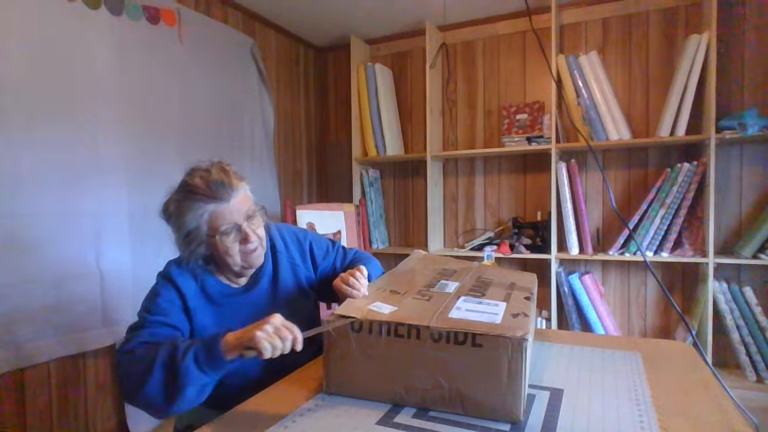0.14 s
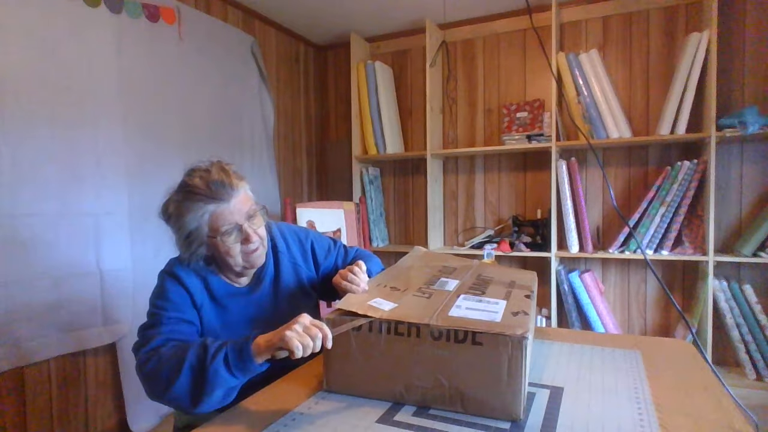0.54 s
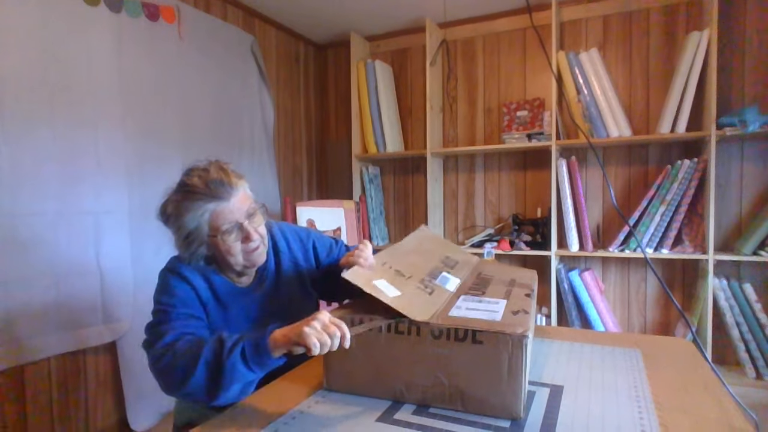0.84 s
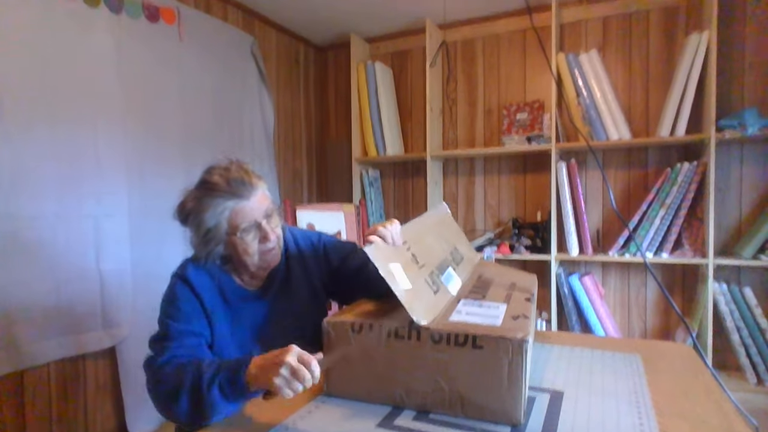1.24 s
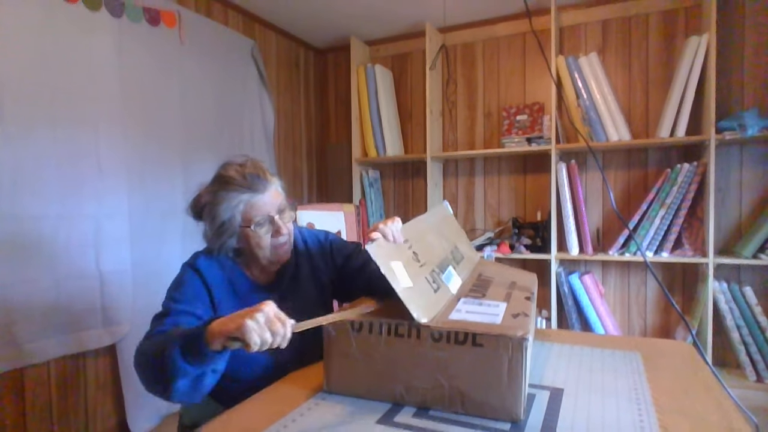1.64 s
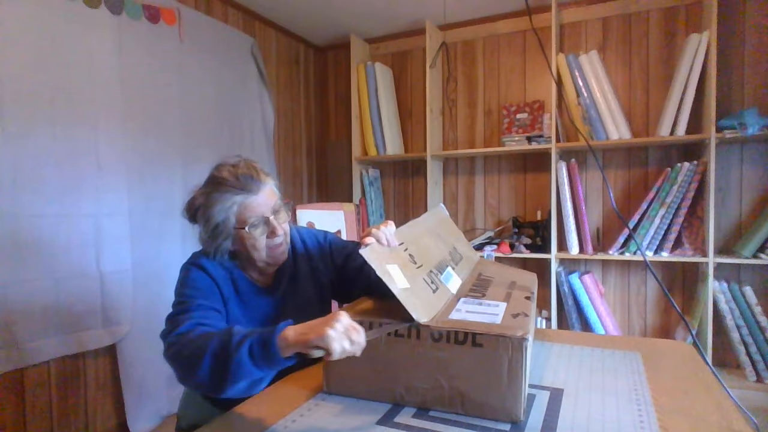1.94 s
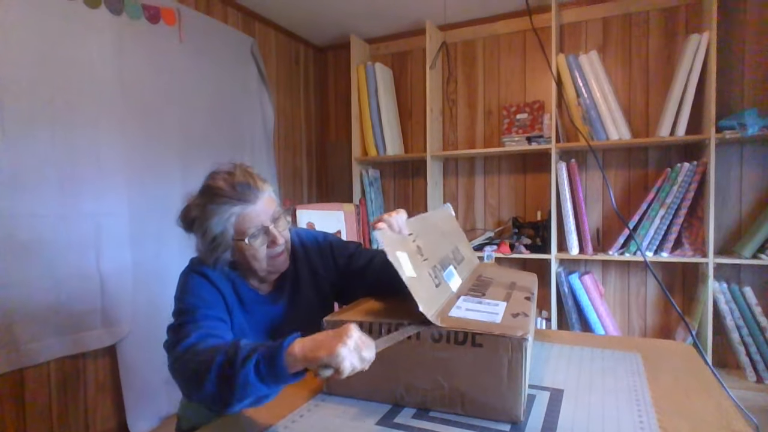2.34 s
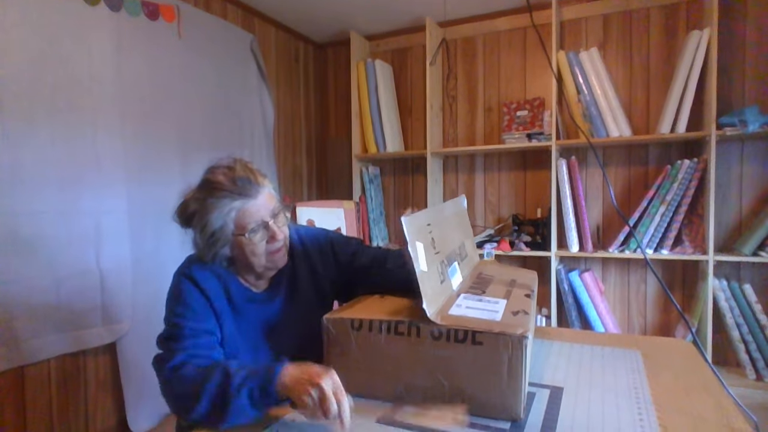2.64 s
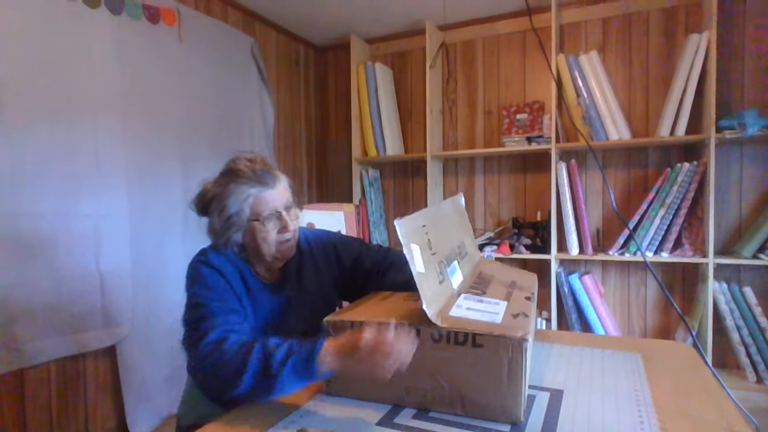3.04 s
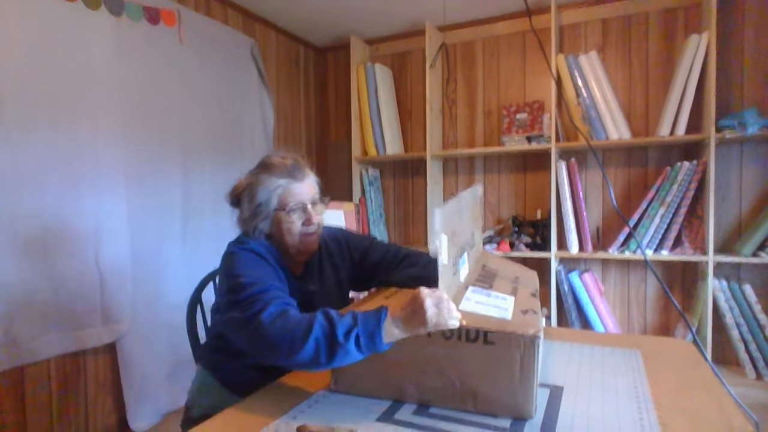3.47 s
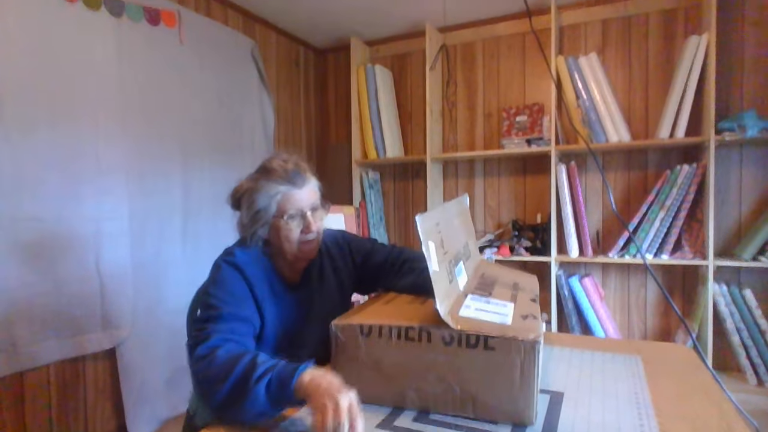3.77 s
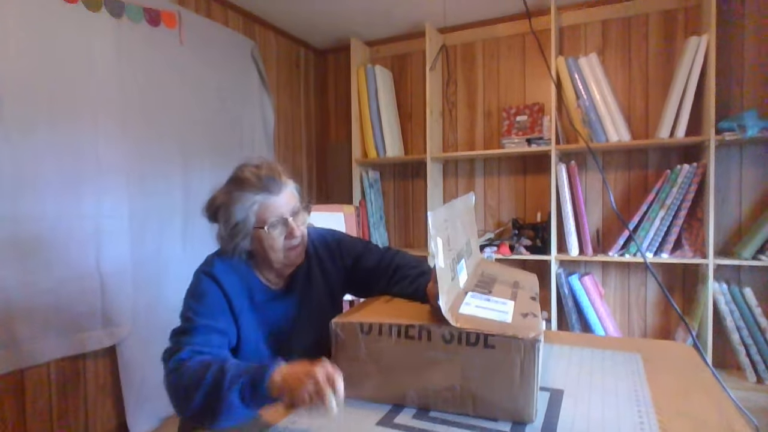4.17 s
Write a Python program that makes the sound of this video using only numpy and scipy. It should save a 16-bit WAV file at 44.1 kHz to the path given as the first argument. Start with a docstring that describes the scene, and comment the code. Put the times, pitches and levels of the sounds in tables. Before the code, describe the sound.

A small, fairly dry wooden room with faint low rumble, heard close in stereo. From 0 to 0.5 s a blade and flap scrape softly on cardboard, with light hollow knocks and a sharp tape snap near 0.4. At 0.7-1.1 s come stronger gritty rasps, drumming panels and a dense run of crackling snaps, as knitted sleeves begin brushing. Around 1.25-1.6 s it quietens to a small snap, dull boxy thumps and faint cloth. At 1.9 s there is a short scrape and blade tap; at 2.15-2.2 s a tight cluster of snaps with a hard box knock, the loudest tearing moment. Sleeves swish from 2.4 s, with soft thumps at 2.8. At 2.9-3.15 s the dropped knife bounces quickly, handle thudding, blade clicking and ringing thinly. Cloth sweeps continue at 3.25-4.3 s, with a faint scrape at 3.4, a soft boomy knock at 3.87 and tiny last snaps after 4.17.

```python
"""A small wood-panelled room, in stereo: a long knife works under the taped flap of a cardboard box on a table.
At first blade and flap scrape, tape snaps and the box knocks, as sweater sleeves begin to brush past.
A dense run of snaps and a hard knock follow; the dropped knife then bounces, its handle thudding and blade ringing.
Sleeves sweep on over cardboard and tabletop, with a short scrape, softer knocks and a few last snaps.
Friction is built from random slips, snaps from noise bursts, blows from decaying modes, over a low rumble."""
import sys
import numpy as np
from scipy import signal
from scipy.fft import rfft, irfft
from scipy.io import wavfile
from scipy.ndimage import uniform_filter1d

SR = 44100
rng = np.random.default_rng(int(sys.argv[2]) if len(sys.argv) > 2 else 0)


def generate_wav(signal):
    """Clip the signal to [-1, 1] and save it as 16-bit WAV at the path in sys.argv[1]."""
    frames = np.transpose(np.atleast_2d(signal))
    scaled = np.clip(frames, -1, 1) * 32767
    pcm = np.round(scaled).astype(np.int16)
    wavfile.write(sys.argv[1], SR, pcm)


N = 189833

# Room rumble. Each row: frequency in Hz, relative density in dB per Hz.
AMBIENCE_SPECTRUM = [(15,2), (33,2.5), (48,11), (70,-10.5), (140,-6), (350,-13), (700,-17), (2000,-24),
                     (5000,-53), (16000,-66)]
# Stereo width of diffuse sound. Each row: frequency in Hz, side against mid in dB, before a source's own side level.
STEREO_WIDTH = [(30,-12), (130,-20), (280,-19), (550,-10), (1100,-6), (3000,-5), (8000,-2.2), (14000,-.8)]
# Decay of the room. Each row: frequency in Hz, time to fall 60 dB in seconds.
ROOM_DECAY = [(120, 0.94), (500, 0.44), (2000, 0.27), (6000, 0.17), (15000, 0.16)]
EDGE_HZ = 16050  # upper limit of the recorder

# Sleeves sweeping past. Each row: start in seconds, speeding up in seconds, slowing down in seconds,
# hiss of the fibres in dB, rub on the surface beneath in dB (both before the trims in sleeves()).
SLEEVE_SWEEPS = [(.66, 0.11, .3, -41, -47), (1.02, 0.19, 0.28, -44, -50.5),
                 (1.285, 0.026, 0.045, -45.5, -58), (1.44, 0.027, 0.11, -55, -57),
                 (1.55, 0.045, 0.025, -44.5, -51.5), (2.355, 0.013, 0.047, -44, -46.5),
                 (2.39, 0.079, .08, -38.5, -44), (2.52, 0.095, 0.057, -36.5, -51.5),
                 (2.58, .18, 0.28, -29, -47), (3.02, 0.12, 0.19, -47.5, -50.5),
                 (3.24, .03, 0.088, -37, -49.5), (3.27, .17, 0.13, -31, -41.5),
                 (3.56, 0.032, 0.062, -37.5, -45.5), (3.655, 0.22, .17, -30, -38.5),
                 (3.96, .02, 0.026, -33.5, -36.5), (4.02, 0.072, 0.24, -44, -56),
                 (4.21, 0.035, .16, -41.5, -59)]
# Powers shaping the loudness of a sweep: while speeding up, while slowing down (no unit).
SWEEP_POWERS = (0.95, 1.34)
STIR_HISS_DB, STIR_RUB_DB = -60, -65  # the cloth never lies quite still; before the same trims
# Fine hiss of knitted fibres. Each row: frequency in Hz, relative density in dB per Hz.
FIBRE_HISS_SPECTRUM = [(800, -11), (2500, -7.5), (4200, -1), (7300, 1), (9000, -2.5), (15500, -0.5)]
# Rub of cloth on the surface beneath. Each row: frequency in Hz, relative density in dB per Hz.
CLOTH_RUB_SPECTRUM = [(60, -6.5), (130, -2), (260, -2.5), (430, 3.5), (700, -2.5), (1500, 1), (2800, -0.5),
                      (5000, -11), (12000, -75)]

# Blows on the box. Each row: start in seconds, level in dB, brightness (low-pass cutoff) in Hz,
# boom of the struck panel in Hz, boom relative to the level in dB.
BOX_KNOCKS = [(0.042,-52,1220,135,-6), (0.281,-40.5,925,145,-5.5), (.388,-31.5,930,125.5,-13),
              (.706,-34,655,138,-7), (1.368,-37.5,920,160,3.5), (1.383,-45,408,202,8.5),
              (1.591,-43,1160,118,-7), (1.87,-40,480,150,-1.5), (2.178,-25,2200,146,-9.5),
              (2.770,-31.5,796,152,-7), (2.797,-33,426,138,-4), (3.243,-44,500,140,-13),
              (3.865,-32,750,123.6,0), (3.889,-49,550,131,-14)]
# Blade tapping the box. Each row: start in seconds, level in dB, brightness (low-pass cutoff) in Hz.
BLADE_TAPS = [(1.9485, -30.5, 4000)]
# Main modes of the box, led by a low resonance of the table and floor beneath it. Each row: frequency in Hz,
# relative level in dB, time to fall 60 dB in seconds.
BOX_MODES = [(53,4,0.075), (121,-6.5,0.47), (209.6,-7,0.32), (328.3,2,0.17), (420,1,0.17), (492.3,7.5,0.12),
             (640,3,0.07), (900,-49,0.25), (990,-4,0.28)]
# Main modes of the knife. Each row: frequency in Hz, relative level in dB, time to fall 60 dB in seconds.
KNIFE_MODES = [(221, -8.5, 0.37), (425, -13.5, 0.3), (474, -20.5, 0.59), (710, -12.5, 0.11),
               (1088, -11.5, 0.36), (1150, -14.5, 0.28), (1340, -12, 0.13), (1760, -19, 0.26),
               (1925, -9, 0.11), (2510, -7.5, 0.13), (3300, -16.5, 0.2), (4170, -34, .22)]
# Lesser resonances of the box panels. Each row: frequency in Hz, relative density in dB per Hz.
PANEL_SPECTRUM = [(50, 5.5), (140, -0.5), (480, 0.5), (800, -1), (2000, -5), (4500, 1.5), (15000, 1)]

# Knife bouncing on the table. Each row: start in seconds, thud of the handle in dB, click of the blade in dB,
# centre of the click in Hz.
KNIFE_BOUNCES = [(2.9095, -23, -14.5, 4700), (2.916, -36.5, -23, 8200), (2.9385, -19, -17.5, 1800),
                 (2.9512, -26, -24.5, 3500), (2.966, -26, -44, 2000), (2.9895, -26, -20.5, 7350),
                 (3.011, -30.5, -45, 11000), (3.0686, -38, -35.5, 7500), (3.088, -38.5, -33, 7360),
                 (3.1331, -48, -36.5, 7500)]
# The blade ringing while clear of the table. Each row: start in seconds, level in dB.
BLADE_RINGS = [(3.0, -35.5), (3.088, -41)]
# Modes of the ringing blade. Each row: frequency in Hz, relative level in dB, time to fall 60 dB in seconds.
BLADE_MODES = [(3600,-11,.15), (5450,-11,.2), (8156,-11,.1), (10990,-8,.1), (12200,0,.19)]
# Main modes of the table. Each row: frequency in Hz, relative level in dB, time to fall 60 dB in seconds.
TABLE_MODES = [(136.6,-10.5,0.55), (220.8,-10,0.55), (327.8,0,0.28), (422,-9,0.55), (483.4,-8,0.53),
               (646,-1,0.27), (716,-17,0.28), (759,2,0.22), (835,-3.5,0.34), (969,-2.5,0.48), (1106,0,0.38),
               (1284,-1,0.14), (1300,8.5,0.1), (1425,-1,0.22), (1523,-6,0.12), (1617,10,0.1), (1710,1,0.19)]
# Lesser resonances of the tabletop. Each row: frequency in Hz, relative density in dB per Hz.
TABLETOP_SPECTRUM = [(50,-7), (140,3), (260,-1.5), (700,0), (1600,0.5), (2600,-1.5), (3800,3), (15000,-22)]
# a thud at THUD_DB has its cutoff at THUD_HZ; harder ones are brighter
THUD_HZ, THUD_DB, THUD_OCTAVES_PER_DB = 1240, -22, 0.053

# Blade, flap and hand scraping on cardboard. Each row: start in seconds, speeding up in seconds, slowing down
# in seconds, grit of tape and fibres in dB, rasp of the cut edge in dB, drumming of the panels in dB
# (all three before the trims in scrapes()).
BOX_SCRAPES = [(.005, 0.064, .14, -40.5, -47, -40.5), (.05, 0.2, .16, -39.5, -47.5, -40.5),
               (.275, .02, 0.15, -58, -47.5, -34), (.352, 0.04, 0.17, -39.5, -39.5, -30),
               (.655, 0.018, .09, -58, -55, -42), (.695, 0.058, 0.051, -27.5, -31.5, -24.5),
               (.772, 0.024, .065, -35.5, -39.5, -30.5), (.91, 0.07, 0.065, -31, -34.5, -63),
               (.98, 0.076, 0.069, -29, -25.5, -50), (1.07, 0.024, 0.044, -53, -51, -32),
               (1.866, .008, 0.053, -37.5, -44.5, -51), (1.9, 0.078, .18, -44.5, -42, -43),
               (3.39, 0.095, 0.1, -43, -48, -35.5)]
# Powers shaping the loudness of a scrape: while speeding up, while slowing down (no unit).
SCRAPE_POWERS = (1.05, 1.84)
# Grit of tape and fibres. Each row: frequency in Hz, relative density in dB per Hz.
GRIT_SPECTRUM = [(1500, 2), (3500, -9.5), (5200, 7.5), (7500, 1.5), (9500, 5), (15500, 4)]
# Rasp of the cut edge. Each row: frequency in Hz, relative density in dB per Hz.
RASP_SPECTRUM = [(300,-23), (750,-3.5), (1200,-1.5), (1800,1.5), (2500,3), (3300,-2), (4200,-8), (8000,-17)]
# Drumming of the panels. Each row: frequency in Hz, relative density in dB per Hz.
DRUM_SPECTRUM = [(50, 10), (95, -12), (140, 7), (200, -0.5), (340, 2), (440, 7.5), (600, -0.5), (900, 1.5),
                 (2000, -14.5)]

# Single snaps of tape and fibre. Each row: start in seconds, level in dB before the trim in tape(), centre in Hz.
TAPE_SNAPS = [(0.2845, -29.5, 7040), (0.3906, -18.5, 5700), (.6264, -39.5, 2920), (0.6657, -35, 8000),
              (.7006, -32, 7040), (0.737, -19.5, 5500), (0.8233, -18, 8000), (0.8506, -17, 5350),
              (0.8995, -16, 2800), (.9195, -19.5, 9500), (1.048, -15.5, 3200), (1.24, -30, 3300),
              (2.1445, -20.5, 2488), (2.1575, -24.5, 10900), (2.1649, -17.5, 8650), (2.1788, -8.5, 2730),
              (2.1863, -15.5, 4640), (2.3558, -39, 4000), (4.1753, -33, 5750), (4.233, -28, 7100)]
# Strained tape crackling at random. Each row: start in seconds, length in seconds, middle level in dB
# before the trim in tape().
TAPE_CRACKLES = [(0.701, .3, -29), (4.239, .04, -32.5)]
CRACKLES_PER_S, CRACKLE_HZ, CRACKLE_SPREAD_DB = 40, 6800, 7  # the spread reaches both ways


def gain_of(db):
    """Decibels to amplitude."""
    return 10 ** (np.asarray(db) / 20)


def evened(x):
    """Scales to rms 1."""
    return x / np.sqrt(np.mean(x ** 2) + 1e-20)


def read(points, hz):
    """Reads a spectrum on a log-frequency axis."""
    f, value = np.transpose(points)
    return np.interp(np.log(hz + 1), np.log(f + 1), value)


def add(mix, s, sound):
    """Mixes a sound in at time s, cut off at the end of the mix."""
    part = mix[..., round(s * SR):][..., :sound.shape[-1]]
    part += sound[..., :part.shape[-1]]


def coloured(x, spectrum, size=4096):
    """Causal minimum-phase filter with the given spectrum."""
    hz = abs(np.fft.fftfreq(size, 1 / SR))
    log_gain = np.log(gain_of(read(spectrum, hz)))
    response = np.exp(np.conj(signal.hilbert(log_gain)))
    taps = np.fft.ifft(response).real[:size // 2]
    return signal.oaconvolve(x, taps)[:len(x)]


def spread(mid, side):
    """Two unrelated signals become a left-right pair that is narrower in the bass than in the treble."""
    side = coloured(side, STEREO_WIDTH)
    return np.array([mid + side, mid - side])


def room(x, wet_db, echo_db, echo_s=.0066):
    """One early reflection, its path about 2 m longer, and a short tail whose treble dies first."""
    taps = rng.standard_normal((2, SR // 2)) * (np.arange(SR // 2) > SR * .002)
    hz, t, z = signal.stft(taps, SR, nperseg=256)
    decay = gain_of(-60 * t / read(ROOM_DECAY, hz)[:, None])
    tails = signal.istft(z * decay, SR, nperseg=256)[1]
    response = gain_of(wet_db) * spread(*tails) / np.linalg.norm(tails[0])
    response[:, round(echo_s * SR)] += gain_of(echo_db)
    mono = x.mean(0)[None]
    return x + signal.fftconvolve(mono, response, axes=1)[:, :N]


def strokes(rows, powers):
    """One gain over time for each dB column: every stroke speeds up from rest and slows to rest again."""
    t, power = np.arange(N) / SR, 0
    for start, rise_s, fall_s, *db in rows:
        end = start + rise_s + fall_s
        up, down = np.clip([(t - start) / rise_s, (end - t) / fall_s], 0, 1)
        loudness = np.sin(np.pi / 2 * up) ** powers[0] * np.sin(np.pi / 2 * down) ** powers[1]
        power = power + np.outer(gain_of(db), loudness) ** 2
    return np.sqrt(power)


def drifting(x, patchy_db, size=512):
    """Broad patches of colour come and go as the contact moves."""
    z = signal.stft(x, nperseg=size)[2]
    blur = np.outer(np.hanning(15), np.hanning(50))  # across frequency, across time
    patches = signal.fftconvolve(rng.standard_normal(z.shape), blur, "same")
    return signal.istft(z * gain_of(patchy_db * evened(patches)), nperseg=size)[1][:N]


def friction(spectrum, grains_per_s, size_db, smooth, flutter_db):
    """Tiny slips of uneven size, coming in clumps, over a blur of smaller ones."""
    wander = uniform_filter1d(uniform_filter1d(rng.standard_normal(N), size=260), size=130)
    clumps = gain_of(flutter_db * evened(wander))
    sizes = gain_of(size_db * np.minimum(rng.exponential(1, N), 3.3))
    sizes = sizes * (rng.random(N) < grains_per_s / SR)
    channels = []
    for channel in range(2):
        grains = evened(sizes * rng.choice([-1, 1], N))
        slips = grains + smooth * rng.standard_normal(N)
        slips = drifting(slips * clumps, patchy_db=1.6)
        channels.append(evened(coloured(slips, spectrum)))
    return spread(*channels)


def ringing(modes, t):
    """Decaying modes; neighbours start in opposite directions."""
    hz, db, t60 = np.transpose(modes)[:, :, None]
    signs = (-1) ** np.arange(len(modes))[:, None]
    return (signs * gain_of(db - 60 * t / t60) * np.sin(2 * np.pi * hz * t)).sum(0)


def blows(rows, modes, spectrum, dense_db, t60, smack_db, smack_s=0.0027, side_db=-2.5, size=900):
    """Each blow smacks, then rings the main modes and a diffuse crowd of lesser ones; soft contact dulls both."""
    out, t = np.zeros((2, N)), np.arange(SR // 2) / SR
    tones = ringing(modes, t)
    envelope = (1 + gain_of(smack_db) * np.exp(-t / smack_s)) * gain_of(-60 * t / t60)
    for s, db, bright_hz, *_ in rows:
        noises = rng.standard_normal((2, len(t)))
        dense, side = (coloured(noise * envelope, spectrum) for noise in noises)
        # levels refer to the opening 900 samples, about 20 ms
        mid = tones / tones[:size].std() + gain_of(dense_db) * dense / dense[:size].std()
        dulling = signal.butter(2, min(bright_hz, SR / 3), fs=SR)
        pair = signal.lfilter(*dulling, [mid, side])
        mid, side = pair / pair[:, :size].std(1, keepdims=True)
        add(out, s, gain_of(db) * spread(mid, gain_of(side_db) * side))
    return out


def crack(decay_s, centre_hz, below_db=-11, above_db=-6, size=64):
    """A burst about a millisecond long that swells as the break runs, with one broad resonance."""
    t = np.arange(SR // 20) / SR
    burst = rfft(rng.choice([-1, 1], len(t)) * np.sqrt(t) * np.exp(-t / decay_s))
    # a sudden break excites all pitches about equally
    flattened = burst / (abs(burst) + 1e-9) ** .7
    burst = irfft(flattened, len(t)) * np.exp(-t / (8 * decay_s))
    # so small a source radiates little below its resonance
    shape = [(centre_hz / 8, -30), (centre_hz / 2, below_db), (centre_hz, 0),
             (centre_hz * 2, above_db), (centre_hz * 4, above_db - 3)]
    burst = coloured(burst, shape)
    return burst / burst[:size].std()


def wide_crack(decay_s, centre_hz, side_db):
    """A left-right pair made from two independent cracks."""
    return spread(crack(decay_s, centre_hz), gain_of(side_db) * crack(decay_s, centre_hz))


def ambience(floor_db=-52, sway_db=-38, sway_hz=6, sway_width_hz=0.24):
    """Quiet room rumble and a slow sway of air pressure below hearing."""
    floor = spread(*[evened(coloured(rng.standard_normal(N), AMBIENCE_SPECTRUM)) for channel in range(2)])
    hz = np.fft.rfftfreq(N, 1 / SR)
    phases = np.exp(2j * np.pi * rng.random(len(hz)))
    sway = irfft(phases / (1 + ((hz - sway_hz) / sway_width_hz) ** 2), N)
    return gain_of(floor_db) * floor + gain_of(sway_db) * evened(sway)


def sleeves():
    """Knitted cloth hisses finely and rubs the surface under it."""
    hiss, rub = strokes(SLEEVE_SWEEPS, SWEEP_POWERS)
    hiss = np.hypot(hiss, gain_of(STIR_HISS_DB))
    rub = np.hypot(rub, gain_of(STIR_RUB_DB))
    hiss = hiss * friction(FIBRE_HISS_SPECTRUM, grains_per_s=5000, size_db=0, smooth=1.84, flutter_db=1.43)
    rub = rub * friction(CLOTH_RUB_SPECTRUM, grains_per_s=2000, size_db=3.0, smooth=1.67, flutter_db=1.46)
    return room(gain_of(-1.14) * hiss + gain_of(-2.5) * rub, wet_db=-6.5, echo_db=-29.5)


def box(boom_t60=0.3):
    """The hollow box thumps when shoved, and the blade twangs against it."""
    out = blows(BOX_KNOCKS, BOX_MODES, PANEL_SPECTRUM, dense_db=11.5, t60=0.29, smack_db=-2)
    out += blows(BLADE_TAPS, KNIFE_MODES, PANEL_SPECTRUM, dense_db=2.5, t60=0.18, smack_db=-10)
    t = np.arange(SR // 2) / SR
    # the struck panel bulges in and out at its own low pitch
    for s, db, _, boom_hz, boom_db in BOX_KNOCKS:
        envelope = np.sqrt(2) * gain_of(db + boom_db - 60 * t / boom_t60)
        add(out, s, envelope * np.sin(2 * np.pi * boom_hz * t))
    return out


def dropped_knife(decay_s=0.0013, side_db=-3):
    """The handle drums on the table while the blade clicks and rings thinly."""
    steel, t = np.zeros((2, N)), np.arange(SR // 2) / SR
    for s, _, click_db, hz in KNIFE_BOUNCES:
        add(steel, s, gain_of(click_db) * wide_crack(decay_s, hz, side_db))
    for s, db in BLADE_RINGS:
        add(steel, s, gain_of(db) * ringing(BLADE_MODES, t))
    thuds = []
    for s, db, *_ in KNIFE_BOUNCES:
        bright_hz = THUD_HZ * 2 ** (THUD_OCTAVES_PER_DB * (db - THUD_DB))
        thuds.append((s, db, bright_hz))
    handle = blows(thuds, TABLE_MODES, TABLETOP_SPECTRUM, dense_db=7.0, t60=0.29, smack_db=3)
    return room(steel, wet_db=-8, echo_db=-11) + handle


def off_the_lid(x, echo, spacing_hz):
    """The cardboard just behind the contact reflects the sound and combs it into evenly spaced bands."""
    hz = np.fft.rfftfreq(N, 1 / SR)
    comb = 1 + echo * np.exp(-2j * np.pi * hz / spacing_hz)
    return irfft(rfft(x) * comb, N) / np.hypot(1, echo)


def scrapes():
    """Blade and flap stick and slip on cardboard; the panels drum along."""
    grit, rasp, drum = strokes(BOX_SCRAPES, SCRAPE_POWERS)
    grit = grit * friction(GRIT_SPECTRUM, grains_per_s=2400, size_db=3.8, smooth=1.0, flutter_db=0.3)
    grit = off_the_lid(grit, echo=0.23, spacing_hz=2610)
    rasp = rasp * friction(RASP_SPECTRUM, grains_per_s=1100, size_db=3.2, smooth=.6, flutter_db=1.4)
    drum = drum * friction(DRUM_SPECTRUM, grains_per_s=650, size_db=2.0, smooth=0.64, flutter_db=2.3)
    mix = gain_of(-1.5) * grit + gain_of(-2.5) * rasp + gain_of(-4.5) * drum
    return room(mix, wet_db=-15.5, echo_db=-13.5)


def crackles(count=24):
    """Small snaps of chance size and pitch, unevenly spaced: rows like those of TAPE_SNAPS."""
    rows = []
    for start, length, db in TAPE_CRACKLES:
        for k, (late, size, octaves) in enumerate(rng.uniform(-1, 1, (count, 3))):
            # one snap at a chance moment in each equal slot of time
            after = (k + (1 + late) / 2) / CRACKLES_PER_S
            if after < length:
                hz = CRACKLE_HZ * 2 ** (octaves / 2)
                rows.append((start + after, db + CRACKLE_SPREAD_DB * size, hz))
    return rows


def tape(decay_s=0.00049, side_db=-8):
    """Strands of tape and card give way with dry snaps."""
    out = np.zeros((2, N))
    for s, db, hz in [*TAPE_SNAPS, *crackles()]:
        add(out, s, gain_of(db) * wide_crack(decay_s, hz, side_db))
    return room(gain_of(-3.5) * out, wet_db=-6.5, echo_db=-11.5)


def scene():
    """All sources together, from the room behind to the tape under the blade."""
    return ambience() + sleeves() + box() + dropped_knife() + scrapes() + tape()


def record(dry):
    """The recorder's band limit: a steep linear-phase low-pass."""
    low_pass = signal.firwin(511, EDGE_HZ, window=("kaiser", 9), fs=SR)
    return signal.oaconvolve(dry, low_pass[None], "same")


dry = scene()
out = record(dry)
generate_wav(out)
```